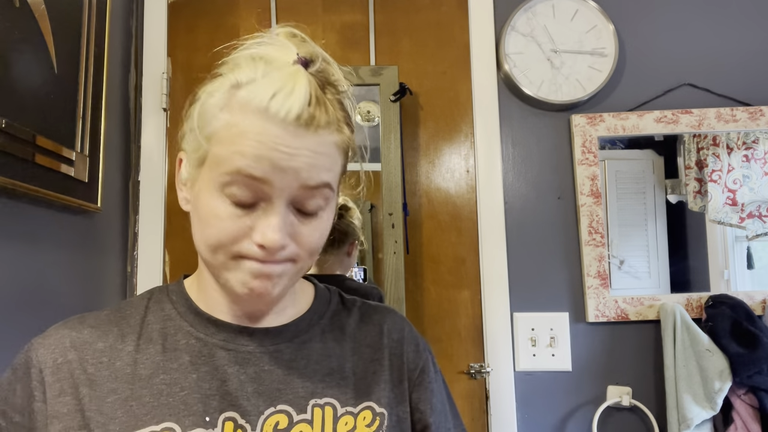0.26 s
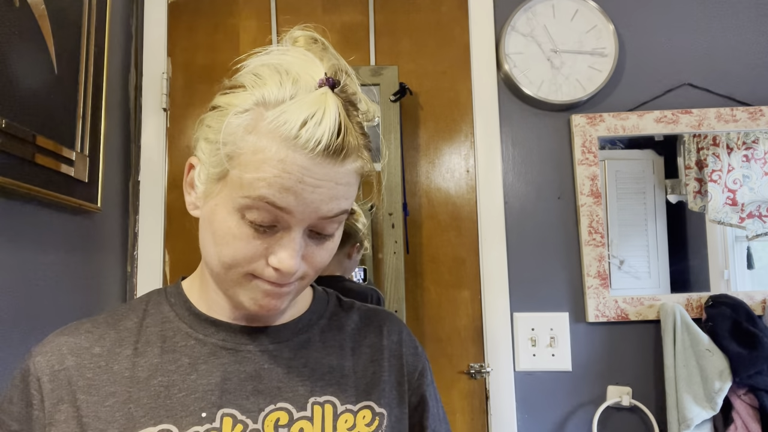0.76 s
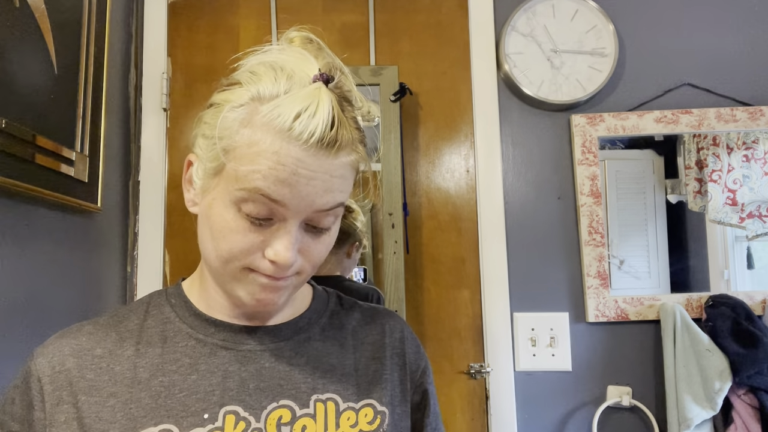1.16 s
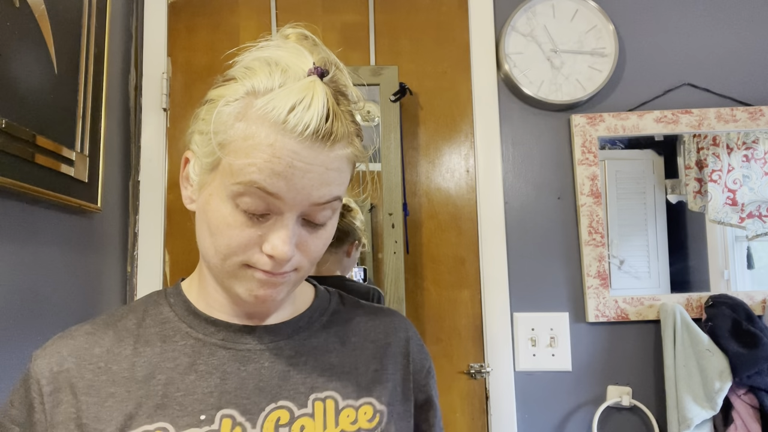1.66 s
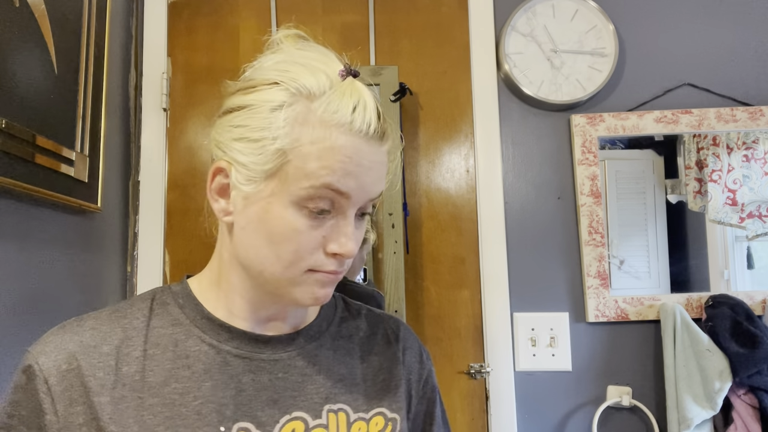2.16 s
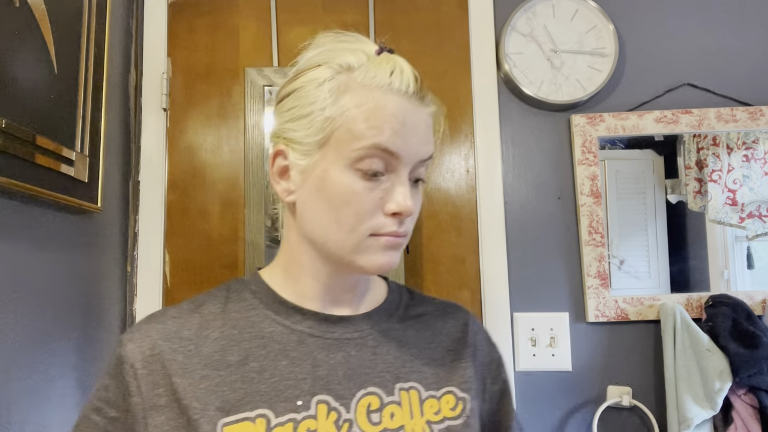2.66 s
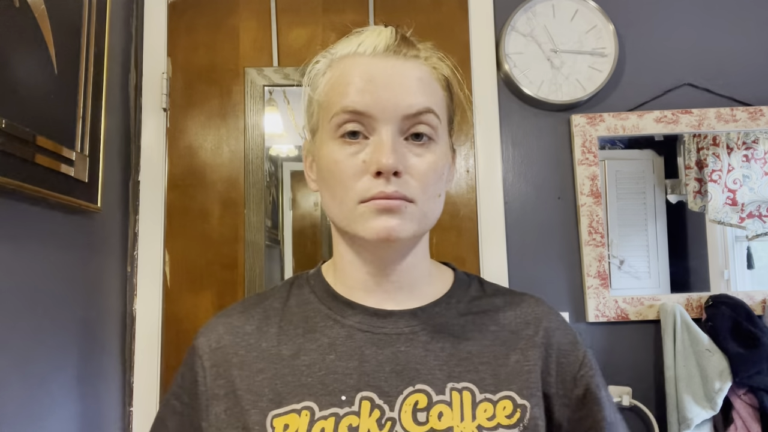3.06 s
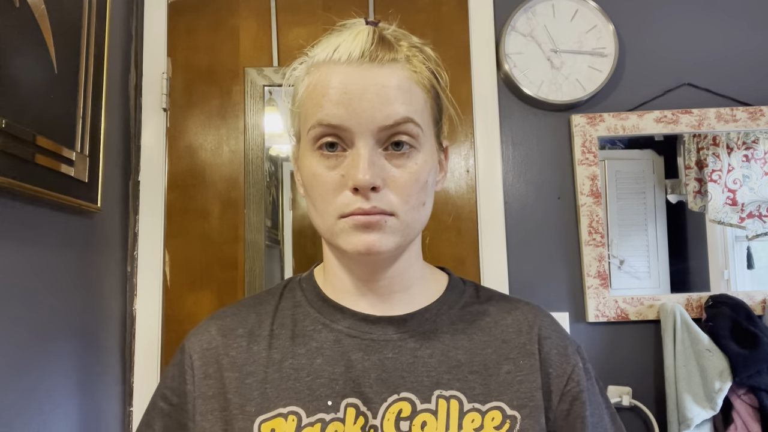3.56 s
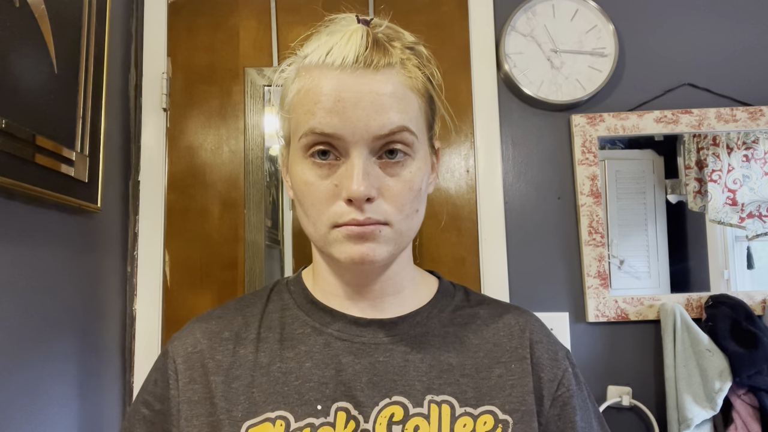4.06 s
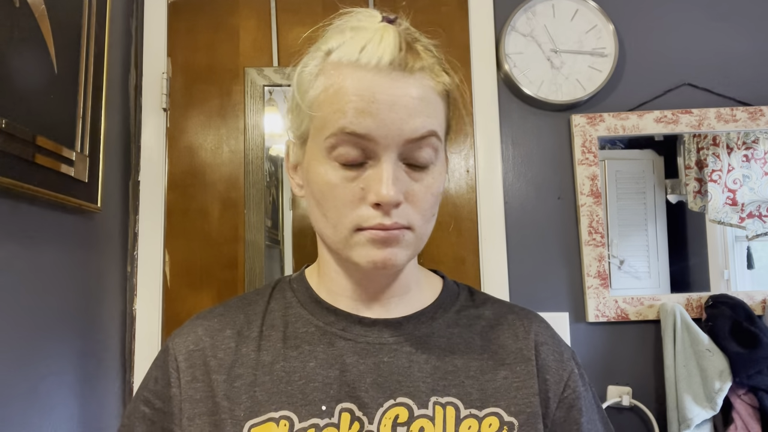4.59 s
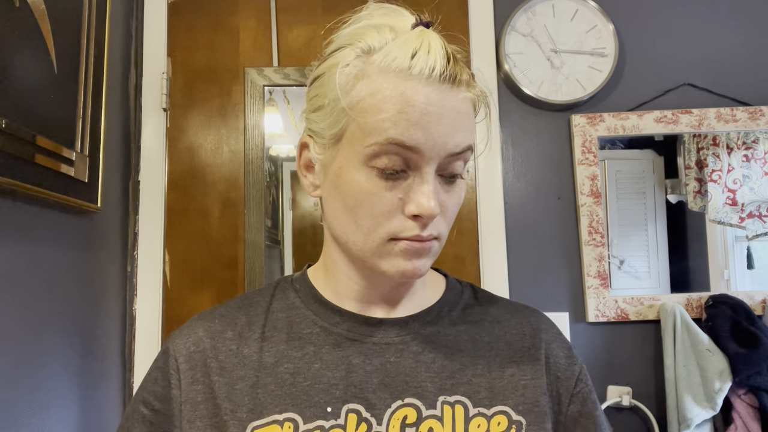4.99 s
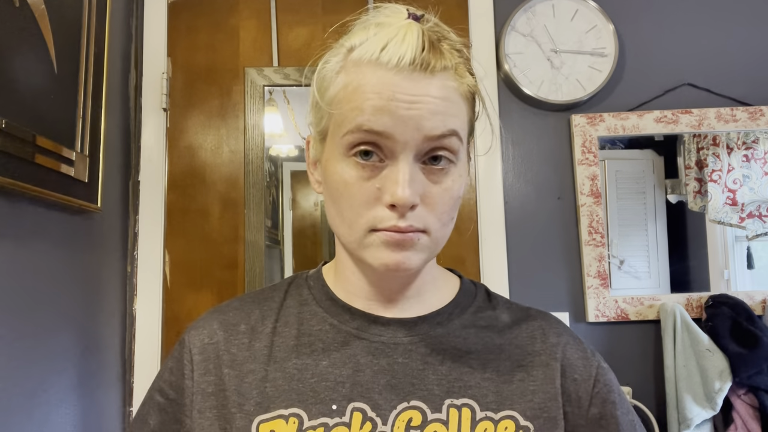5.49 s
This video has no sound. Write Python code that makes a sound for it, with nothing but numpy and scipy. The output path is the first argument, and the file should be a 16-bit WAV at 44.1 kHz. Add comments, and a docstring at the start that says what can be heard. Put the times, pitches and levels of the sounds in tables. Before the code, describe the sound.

A steady, low ventilation rumble runs throughout in a small, hard-walled room with short reflections. For the first second there is only soft rustling of fingers and cotton, with faint slides and tiny plastic ticks from about 0.4 s. From 1.0 to 1.55 s the ticks become denser and slowly louder as a lid turns on its thread. At about 1.6 s it breaks free in a rapid cluster of sharp, bright, loud plastic cracks lasting under a tenth of a second. Pot and lid then land on a hollow counter: several knocks with low boom between 1.85 and 2.05 s, then a strong, duller knock at 2.35 s with a short humming drag and lesser knocks until 2.5 s. Afterwards it is quiet: soft rustles, small taps around 3.3 to 3.6 s, a faint tap near 4.5 s, and light contacts with rubbing at 5.3 and 5.6 s.

```python
"""A low ventilation rumble and the rustle of fingers and a cotton shirt open the scene, in a small hard-walled room.
A small plastic pot is twisted open: fingers slide on the lid, which ticks on its thread and cracks free.
Then pot and lid knock on a hollow counter, and the knocks boom in the room's lowest modes.
Rumble and cloth are patchy coloured noise, slides are trains of tiny clicks, and each contact is a blow
and a rattle that ring pot, rim and counter; the air modes are dying sines."""
import sys
import numpy as np
from scipy import signal
from scipy.fft import rfft, irfft, next_fast_len
from scipy.io import wavfile
from scipy.ndimage import uniform_filter1d

SR = 44100
rng = np.random.default_rng(int(sys.argv[2]) if len(sys.argv) > 2 else 0)


def bounce(signal):
    """Save signal as a 16-bit WAV file at the path given by the first command-line argument."""
    frames = np.transpose(np.atleast_2d(signal))
    limited = np.clip(frames, -1, 1)
    pcm = np.round(limited * 32767).astype(np.int16)
    wavfile.write(sys.argv[1], SR, pcm)


N = 252732  # length in samples

# Ringing modes of the hollow counter, before a contact favours some of them.
# Each row: pitch in Hz, width in Hz, level in dB.
COUNTER_MODES = [(261, 130, 1.5), (356, 35, 6), (403.6, 50, 1.5), (473.6, 35, 7), (631, 35, 2.5),
                 (686, 38, 2.5), (793, 86, -0.5), (970, 88, -0.5), (1224, 390, -4.5)]
# How alike left and right are in the sound off the walls.
# Each row: frequency in Hz, likeness from -1 to 1.
WALLS_LIKENESS = [(150, 0.34), (500, 0.06), (1200, 0.36), (4000, 0.09), (12000, 1)]
# Pot or lid knocks on the counter. Each row: start in seconds, counter level in dB, pot level in dB under
# the counter, rattle time to fall 60 dB in seconds, favoured counter pitch in Hz, focus on that pitch
# in dB per octave squared.
COUNTER_KNOCKS = [(1.845, -41, 9.5, 0.022, 450, 0), (1.854, -17, 7.5, .1, 450, 5),
                  (1.918, -25.5, 7, .05, 800, 8), (1.927, -19.5, 4, .1, 750, -0.5),
                  (2.015, -20.5, 6, 0.14, 800, 5), (2.351, -11, 15, 0.031, 550, 0),
                  (2.45, -15.5, 16.5, 0.086, 600, 2.5), (2.515, -24.5, 21.5, 0.18, 550, 3),
                  (2.84, -56, 19.5, 0.14, 695, 53), (3.286, -35.5, 19, 0.065, 474, 68),
                  (3.44, -42, 11.5, 0.065, 474, 2), (3.536, -26.5, 9, 0.025, 500, 4),
                  (3.644, -51.5, 8, 0.028, 600, 2), (4.022, -63.5, 8.5, 0.048, 660, -0.5),
                  (4.537, -36, 16.5, 0.044, 470, 9), (4.871, -50, 10.5, 0.16, 600, 2),
                  (4.973, -57.5, 30, 0.07, 800, 6), (5.286, -29.5, 26, 0.0106, 500, 9),
                  (5.624, -36, 12, 0.1, 480, 4)]


def amp(db):
    """Gain of a level in dB."""
    return 10 ** (np.asarray(db) / 20)


def unit(x):
    """x at rms 1."""
    return x / np.sqrt(np.mean(x ** 2) + 1e-20)


def along(points, hz):
    """Value at hz between (Hz, value) points, read on a log frequency axis."""
    f, v = np.transpose(points)
    return np.interp(np.log(hz + 1), np.log(f + 1), v)


def filtered(x, response):
    """x with each frequency multiplied by a response, which may also shift its phase."""
    n = x.shape[-1]
    padded = next_fast_len(n + 8192)  # silence at the end leaves room for ringing
    hz = np.fft.rfftfreq(padded, 1 / SR)
    return irfft(rfft(x, padded) * response(hz), padded)[..., :n]


def resonances(modes, f):
    """Response of a body that rings at (Hz, width in Hz, dB) modes, with signs that alternate."""
    total = 0
    for k, (centre, width, db) in enumerate(modes):
        mode = 1j * f * width / (centre * centre - f * f + 1j * f * width)
        total = total + (-1) ** k * amp(db) * mode
    return total


def cushion(f, hz=1800):
    """A body takes up little of a blow above a corner frequency."""
    return 1 / (1 - (f / hz) ** 2 + 1.4j * f / hz)


def spread(pair, alike, colour=lambda hz: 1):
    """Left and right mixed from two unrelated signals, alike to a degree that depends on frequency."""
    def mid_side_gains(hz):
        turn = np.arccos(np.clip(along(alike, hz), -1, 1)) / 2
        return colour(hz) * np.array([np.cos(turn), np.sin(turn)])

    mid, side = filtered(pair, mid_side_gains)
    return np.array([mid + side, mid - side])


def rush(spectrum, alike, patchy_db):
    """Stereo noise of rms 1, coloured by a spectrum, with random gain in patches of time and pitch."""
    cells = signal.stft(rng.standard_normal((2, N)), nperseg=512)[2]
    field = rng.standard_normal(cells.shape[1:])
    for axis in (0, 1):
        field = uniform_filter1d(field, size=6, axis=axis)
    patchy = cells * amp(patchy_db * unit(field))
    pair = signal.istft(patchy, nperseg=512)[1][:, :N]
    return unit(spread(pair, alike, lambda hz: amp(along(spectrum, hz))))


def walls(length):
    """A fresh room answer of energy 1 on the left: noise that builds up, then dies at a speed set by pitch."""
    # Each row: frequency in Hz, time to fall 60 dB in seconds.
    fall_times = [(200, 0.25), (600, 0.19), (2500, 0.2), (8000, 0.22), (15000, 0.061)]
    hz, t, cells = signal.stft(rng.standard_normal((2, length)), SR, nperseg=256)
    dying = cells * amp(-60 * t / along(fall_times, hz)[:, None])
    tail = signal.istft(dying, SR, nperseg=256)[1][:, :length]
    build_up = 1 - np.exp(-np.arange(length) / SR / 0.0027)
    tail = spread(tail * build_up, WALLS_LIKENESS)
    return tail / np.linalg.norm(tail[0])


def ports(pair):
    """The two microphone ports hear the same sound at different phases."""
    # The hands are off to one side. Each row: frequency in Hz, phase by which left leads in radians.
    left_lead = [(200, .1), (500, 1.1), (1200, 1.77), (2500, 1.4), (5000, 1.2), (7000, 0.28), (9000, 1.5),
                 (13000, 1.1)]
    return filtered(pair, lambda hz: np.exp(.5j * along(left_lead, hz) * [[1], [-1]]))


def loudest(x):
    """Stereo x with its loudest 5 ms at rms 1."""
    power = np.mean(x ** 2, axis=0)
    return x / np.sqrt(uniform_filter1d(power, size=SR // 200).max())


def panned(x, db):
    """Stereo x with left raised over right by db."""
    return amp([[db / 2], [-db / 2]]) * x


def rumble():
    """Steady ventilation: deep noise with slightly uneven patches."""
    # Each row: frequency in Hz, level in dB before the whole is set to its level.
    rumble_spectrum = [(12, -54), (20, -25.5), (86, -1), (200, -31), (239, -21), (285, -26.5), (333, -24.5),
                       (378, -33.5), (476, -36.5), (698, -42.5), (1160, -38), (1260, -53.5), (3970, -76),
                       (4630, -62.5), (9000, -73.5), (11700, -100), (19800, -120)]
    # Each row: frequency in Hz, left-right likeness from -1 to 1.
    rumble_likeness = [(60, 1), (180, 0.77), (550, -0.63), (1650, -0.85), (4970, 0.21), (15000, -0.24)]
    return amp(-47.5) * rush(rumble_spectrum, rumble_likeness, patchy_db=1.5)


def strokes():
    """Gains of body, hiss and drag: each stroke swells, holds and dies away over the resting level."""
    # Strokes of fingers and cloth. Each row: start in seconds, swell in seconds, hold in seconds,
    # body level in dB, hiss level in dB, level of the drag on the counter in dB.
    stroke_rows = [(-.05, .05, .13, -60, -58.5, -87), (.24, 0.138, 0.067, -58, -64, -77),
                   (.44, 0.049, .3, -62.5, -69.5, -94), (.85, 0.045, 0.038, -63.5, -87, -69),
                   (1.2, 0.35, 0.52, -63, -63.5, -70), (1.835, 0.024, .45, -53.5, -57.5, -56),
                   (2.325, .025, 0.013, -34, -65, -24.5), (2.375, 0.036, 0.079, -40, -56.5, -35.5),
                   (2.546, 0.037, 0.017, -62.5, -82, -32.5), (3.01, 0.092, .27, -57, -58, -57.5),
                   (3.34, 0.044, 0.31, -57.5, -63.5, -50), (3.75, 0.047, 0.0735, -68.5, -78.5, -65.5),
                   (4.53, 0.024, 0.14, -55, -62.5, -74), (4.57, 0.073, 0.044, -58, -61, -51),
                   (4.733, 0.12, 0.18, -67, -82, -68.5), (5.259, 0.038, 0.15, -66.5, -85, -59.5),
                   (5.37, 0.2, 0.069, -54, -62, -49.5), (5.56, 0.081, .1, -55, -59, -67)]
    # While the hands rest: levels of body, hiss and drag in dB.
    resting_db = [-77, -84, -71]
    t60 = 0.25  # seconds for a stroke to fall 60 dB
    t = np.arange(N) / SR
    power = amp(resting_db)[:, None] ** 2
    for start, swell, hold, *levels_db in stroke_rows:
        rise = np.clip((t - start) / swell, 0, 1) ** 2
        since_hold = np.maximum(t - start - swell - hold, 0)
        shape = rise * amp(-60 * since_hold / t60)
        power = power + (amp(levels_db)[:, None] * shape) ** 2
    return np.sqrt(power)


def rustle():
    """Skin and cotton rub: a duller body, a finer hiss, and a drag that hums in the counter."""
    # Noise colours of the cloth. Each row of both: frequency in Hz, relative level in dB per Hz.
    body_spectrum = [(250, -38.5), (450, -2.5), (900, -2), (2000, -1.5), (3200, -11), (4800, -17),
                     (6500, -21), (9000, -53)]
    hiss_spectrum = [(1500, -28), (3500, -9), (6000, -4.5), (9000, -5.5), (13000, -3), (17000, -11)]
    body, hiss, drag = strokes()
    # the drag favours counter modes near 480 Hz
    board = [(hz, w, db - 30 * np.log2(hz / 480) ** 2) for hz, w, db in COUNTER_MODES]
    rub = rush([(500, 0)], WALLS_LIKENESS, patchy_db=3.0)
    hum = unit(filtered(rub, lambda f: resonances(board, f) * cushion(f)))
    dull = body * rush(body_spectrum, WALLS_LIKENESS, patchy_db=4.5)
    fine = hiss * rush(hiss_spectrum, [(5000, 0.86)], patchy_db=5.0)
    return dull + fine + drag * hum


def slides():
    """Random slips of uneven size under a smooth stroke, each a tiny click in a resonance, broad for most
    slides and narrow for squeaks."""
    # A finger slides or creaks on the lid. Each row: start in seconds, length in seconds,
    # level in dB before the walls answer, centre in Hz, width in Hz, slips per second.
    slide_rows = [(0.378, 0.089, -58, 2090, 1530, 2500), (0.544, 0.31, -69.5, 5340, 7900, 250),
                  (0.855, 0.097, -56, 3100, 2800, 6900), (1.593, 0.069, -30.5, 2400, 5030, 750),
                  (4.012, 0.17, -94, 3610, 50.3, 6400), (5.54, 0.12, -67, 3080, 304, 3000)]
    out = np.zeros((2, N + SR))
    length = SR // 2
    for start, seconds, db, hz, width, rate in slide_rows:
        n = round(seconds * SR)
        sizes, unevenness = rng.standard_normal((2, length))[:, :n]
        slipping = rng.random(length)[:n] < rate / SR
        slips = slipping * sizes * amp(2.6 * unevenness) * np.sqrt(np.hanning(n))
        rung = filtered(slips, lambda f: resonances([(hz, width, 0)], f) ** 2)
        direct = np.pad(amp(db) * unit(rung), (0, length - n))
        answer = signal.fftconvolve(direct[None], walls(length), axes=1)[:, :length]
        out[:, round(start * SR):][:, :length] += direct + amp(-5.5) * answer
    return ports(out[:, :N])


def contact_rows():
    """Lid and knock events as (start s, pot dB, counter dB, rim dB, rattle t60 s, favoured Hz, focus)."""
    # The lid ticks and cracks on its thread; levels are of the loudest 5 ms, before panning.
    # Each row: start in seconds, pot level in dB, rim level in dB.
    lid_rows = [(0.387, -52, -61), (0.677, -52.5, -58.5), (0.831, -54.5, -57), (0.988, -60, -56),
                (1.039, -69, -70), (1.061, -54, -59), (1.082, -52, -59), (1.102, -66, -70),
                (1.138, -48.5, -53), (1.182, -49, -55.5), (1.249, -58, -64.5), (1.278, -57, -64),
                (1.294, -45, -53), (1.335, -57.5, -62), (1.37, -46, -52), (1.443, -43, -50),
                (1.471, -52, -49), (1.487, -66.5, -44), (1.546, -51, -48.5), (1.561, -42, -52),
                (1.576, -40, -32.5), (1.591, -36, -31), (1.6, -13.5, -15), (1.617, -15.5, -26.5),
                (1.639, -21.5, -15), (1.664, -30.5, -28), (2.405, -46.5, -31), (2.503, -41, -36.5),
                (3.151, -51.5, -52.5)]
    rows = []
    for start, pot_db, rim_db in lid_rows:
        # the counter sounds under the pot; below -46 dB it loses 2 dB more per dB
        counter_db = pot_db - 5 - 2 * max(-46 - pot_db, 0)
        # a crack shakes the whole counter and rattles longer; a tick shakes little but one mode
        t60, focus = (0.038, 3) if pot_db > -40 else (0.017, 16)
        rows.append((start, pot_db, counter_db, rim_db, t60, 700, focus))
    for start, db, soft_db, *rest in COUNTER_KNOCKS:
        # a softer contact dulls the rim even more than the pot
        rows.append((start, db - soft_db, db, db - 1.4 * soft_db, *rest))
    return rows


def contacts():
    """Each contact is a sharp blow and a short spiky rattle that ring pot, rim and counter; the walls answer."""
    # Ringing modes of the pot, before a soft contact weakens the upper ones, and of the thin lid rim.
    # Each row of both: pitch in Hz, width in Hz, level in dB.
    pot_modes = [(1280, 510, 5.5), (1792, 160, 6.5), (2090, 290, 9), (2850, 730, 5.5), (3340, 530, 6.5),
                 (4670, 2400, -9)]
    rim_modes = [(6100, 8200, 6.5), (8350, 2400, 13), (15100, 6100, 8)]
    pot_pan_db, counter_pan_db = -0.5, -3.5  # left over right
    length = SR * 2 // 5
    out = np.zeros((2, N + SR))
    t = np.arange(length) / SR
    for start, pot_db, knock_db, rim_db, t60, spot_hz, focus in contact_rows():
        spikes_db = 6.3 * rng.standard_normal(length)
        force = rng.standard_normal(length) * amp(spikes_db - 60 * t / max(t60, .004))
        force[0] += 6  # the sharp blow
        answer = signal.fftconvolve(force[None], walls(length), axes=1)[:, :length]
        heard = force + amp(-2.0) * answer
        # where the blow lands decides which modes of the counter speak
        board = [(hz, w, db - focus * np.log2(hz / spot_hz) ** 2) for hz, w, db in COUNTER_MODES]
        knock = filtered(heard, lambda f: resonances(board, f) * cushion(f, hz=2690) ** 2)
        # a soft contact, poor in rim snap, also leaves the upper modes of the pot weak
        tilt_db = 0.17 * (rim_db - pot_db + 7.5)  # per octave
        shell = [(hz, w, db + tilt_db * np.log2(hz / 2200)) for hz, w, db in pot_modes]
        pot = filtered(heard, lambda f: resonances(shell, f) * cushion(f, hz=5040))
        rim = filtered(heard, lambda f: resonances(rim_modes, f))
        plastic = panned(amp(pot_db) * loudest(pot) - amp(rim_db) * loudest(rim), pot_pan_db)
        counter = panned(amp(knock_db) * loudest(knock), counter_pan_db)
        out[:, round(start * SR):][:, :length] += plastic + counter
    return ports(out[:, :N])


def thuds():
    """The air modes swell over a few crossings of the room, then die away, a little unevenly at the two ports."""
    # Room air modes. Each row: pitch in Hz, level in dB before the tilt, time to fall 60 dB in seconds.
    air_modes = [(75, 3.5, 0.39), (137.6, 3.5, 0.37), (187, -13.5, 0.43)]
    # The whole weight of the hands lands: start in seconds, gain of the air modes in dB.
    heavy_landing = (1.856, -16)
    boom_db, tilt_db = -15.5, 3  # boom against the knock; tilt toward the higher modes per octave
    out = np.zeros((2, N + SR))
    t = np.arange(SR) / SR
    skew = np.array([[.12], [-.12]])  # left and right phase in radians
    blows = [heavy_landing] + [(start, db + boom_db) for start, db, *_ in COUNTER_KNOCKS]
    ring = 0
    for hz, level_db, t60 in air_modes:
        decay = amp(level_db + tilt_db * np.log2(hz / 100) - 60 * t / t60)
        ring = ring + decay * np.sin(2 * np.pi * hz * t + skew)
    swell = 1 - np.exp(-t / 0.0065)
    for start, db in blows:
        out[:, round(start * SR):][:, :SR] += amp(db) * ring * swell
    return out[:, :N]


def scene():
    """Pot, counter, hands and the steady rumble added together."""
    return contacts() + thuds() + slides() + rustle() + rumble()


def record(dry):
    """A narrow dip near 11 kHz dulls the treble; the highest peaks are rounded off; the top is cut away."""
    # A narrow dip in the treble near 11 kHz. Each row: frequency in Hz, gain in dB.
    treble_dip = [(8800, 2), (10000, -4.5), (10700, -22), (11300, -32), (12000, -8), (13000, -5.5)]
    heard = filtered(dry, lambda hz: amp(along(treble_dip, hz)))
    rounded = heard / (1 + np.abs(heard / .9) ** 6) ** (1 / 6)
    return filtered(rounded, lambda hz: hz < 16000)


dry = scene()
out = record(dry)
bounce(out)
```